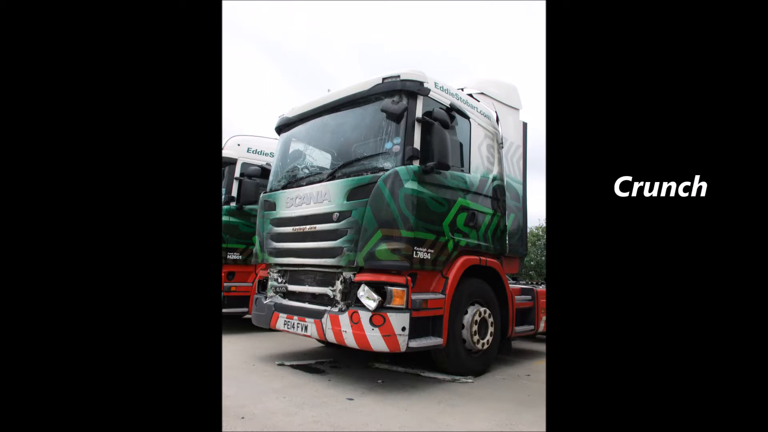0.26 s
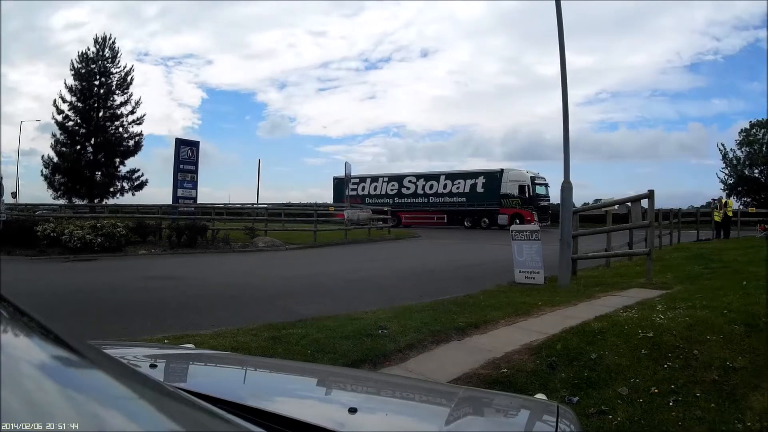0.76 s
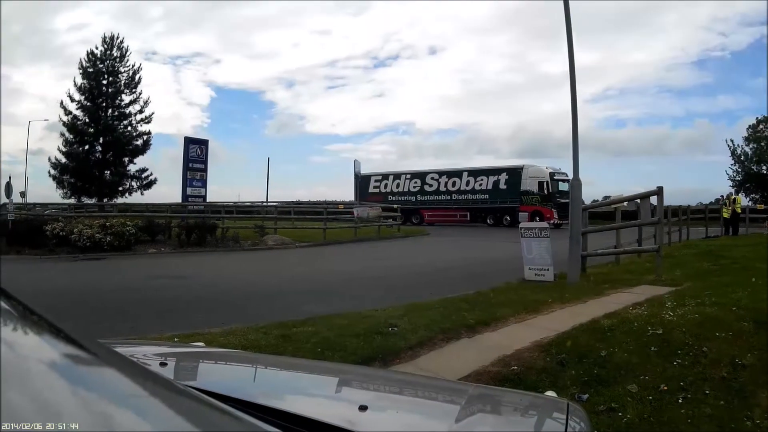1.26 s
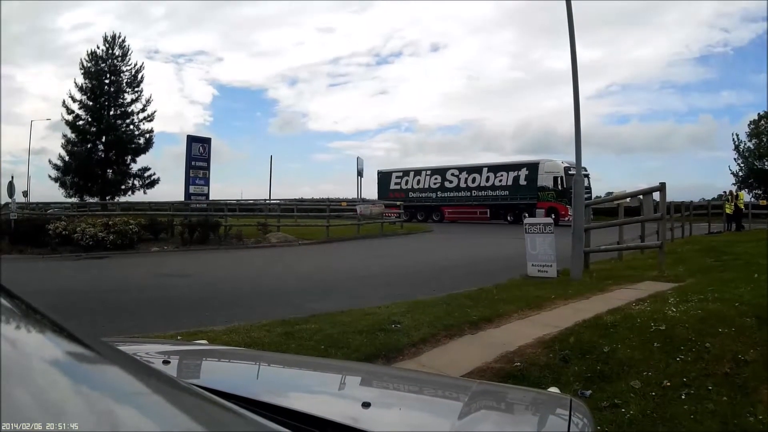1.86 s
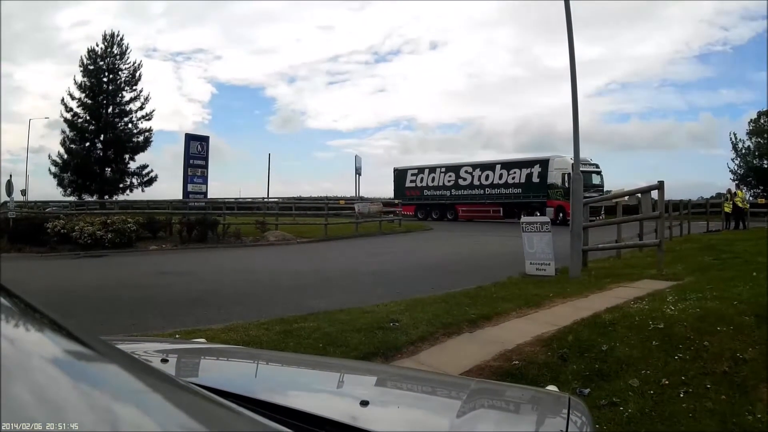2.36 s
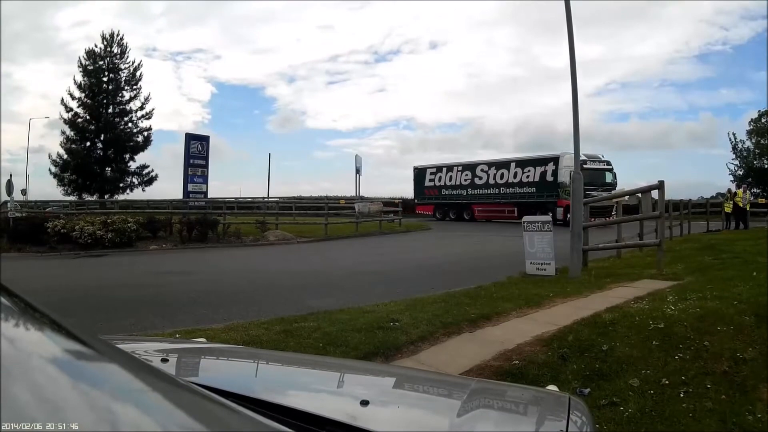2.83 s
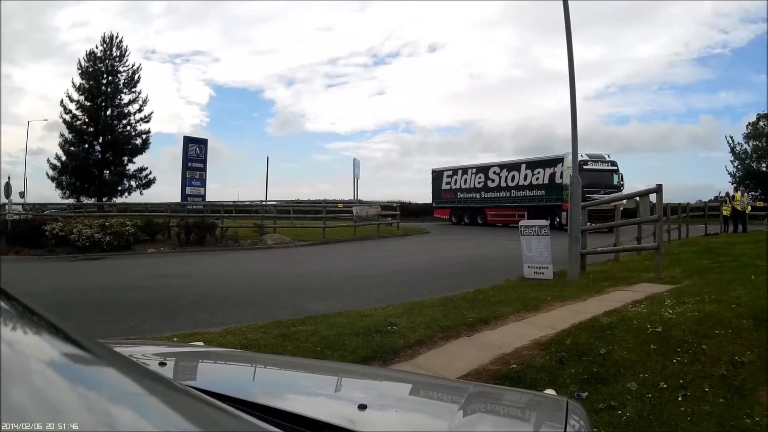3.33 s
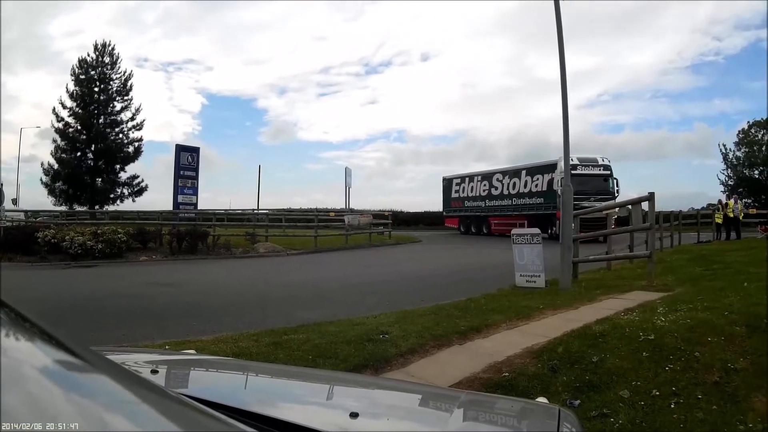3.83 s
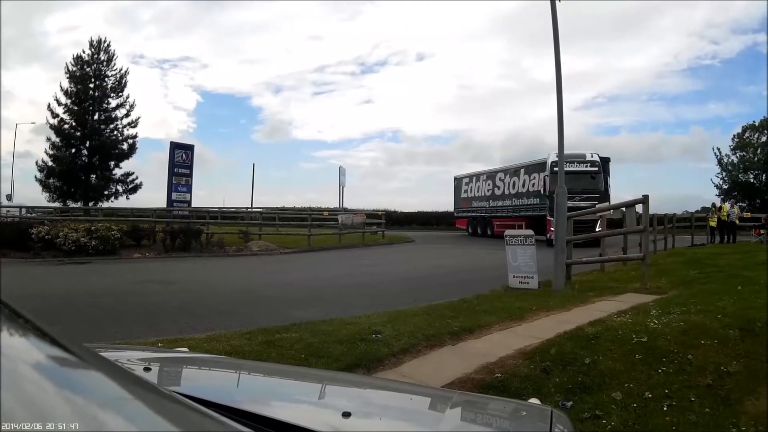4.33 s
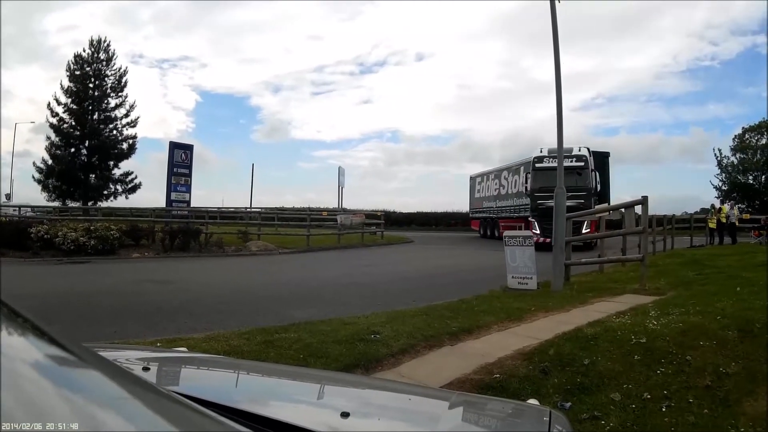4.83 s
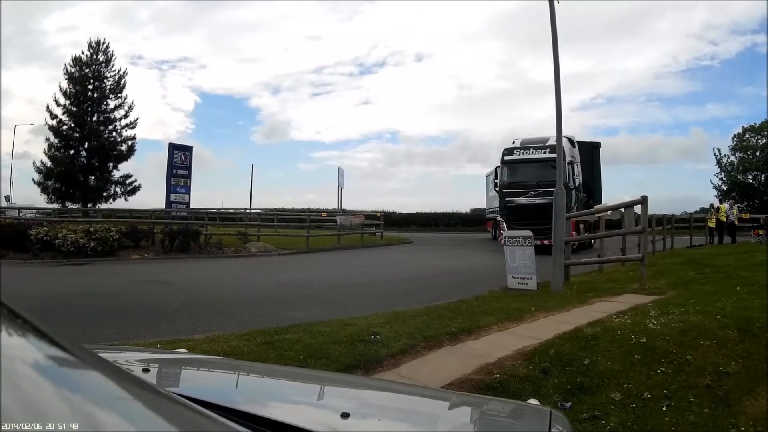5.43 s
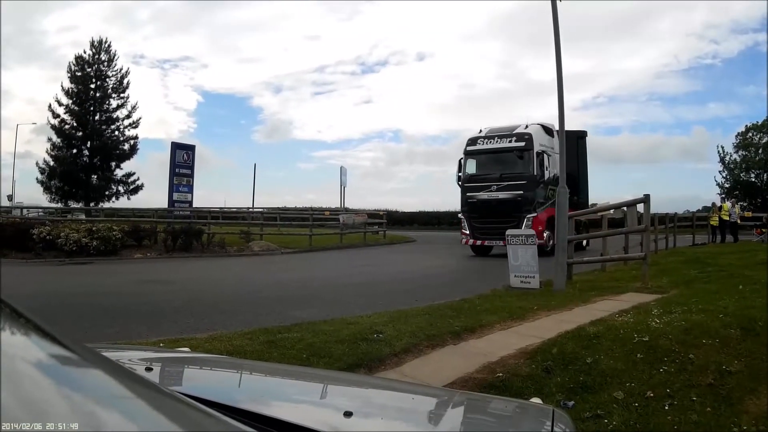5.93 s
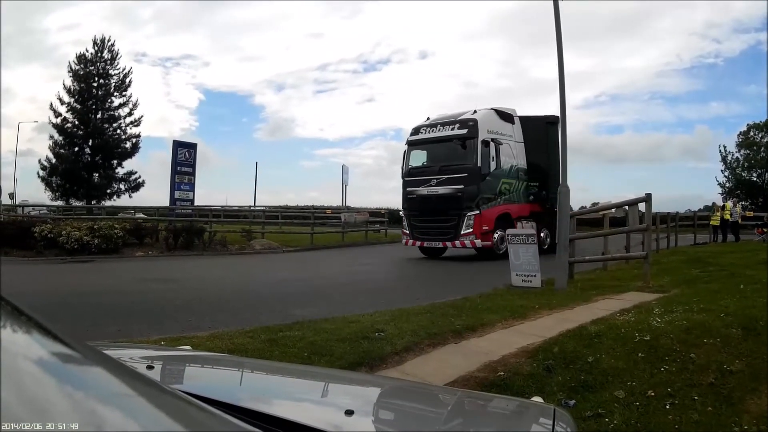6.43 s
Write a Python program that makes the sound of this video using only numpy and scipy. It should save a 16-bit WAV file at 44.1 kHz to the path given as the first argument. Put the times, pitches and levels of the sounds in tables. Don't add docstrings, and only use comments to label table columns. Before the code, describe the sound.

After brief silence, a heavy lorry's rough tyre roar and diesel rumble build closer while wind gusts thud against a small outdoor microphone.

```python
import sys
import numpy as np
from scipy import signal
from scipy.fft import rfft, irfft
from scipy.io import wavfile
from scipy.ndimage import uniform_filter1d

SR = 44100
rng = np.random.default_rng(int(sys.argv[2]) if len(sys.argv) > 2 else 0)


def makeup_ratio(level_db):
    decades = np.asarray(level_db, float) / 20
    return 10 ** decades


def to_wav(sig):
    pcm = np.clip(np.atleast_2d(sig), -1, 1) * 32767
    pcm = np.round(pcm).astype(np.int16)
    wavfile.write(sys.argv[1], SR, pcm.T)


N = 294588
T = np.arange(N) / SR

# time in seconds, tyre roar in dB, engine load in dB, charge-air boost in dB.
LORRY = [(.62, -20.5, -3, -5), (1.0, -19.5, -2.5, -.5), (1.5, -19, -2.5, -1), (1.8, -17, 0, -1.5),
         (2.0, -19.5, 0, 0), (2.5, -17, 0.5, 0), (3.0, -17.5, 0.5, 3), (3.45, -17, 1, 1.5),
         (3.8, -15, 0.5, 2.5), (4.05, -18, -2, -1.5), (4.4, -18, 1, 0), (4.65, -18.5, -2, -3.5),
         (5.0, -18.5, -1, -3), (5.4, -18.5, -1.5, -2.5), (5.95, -15.5, 1, 2), (6.25, -16.5, 3, 1.5),
         (6.68, -14.5, 5, 5)]


def evened(x):
    return x / np.sqrt(np.mean(x ** 2) + 1e-20)


def read(points, hz):
    table_hz, db = np.transpose(points)
    return np.interp(np.log(hz + 1), np.log(table_hz + 1), db, -90, -90)


def curves(rows):
    s, *columns = np.transpose(rows)
    return [np.interp(T, s, column) for column in columns]


def band(x, lo_hz, hi_hz, order=2):
    edges_hz = [lo_hz, min(hi_hz, SR / 2 - 100)]
    return signal.sosfilt(signal.butter(order, edges_hz, "band", fs=SR, output="sos"), x)


def hiss(colour, patchy_db, flicker_db):
    frames = N // 128 + 5
    real, imaginary, patches = rng.standard_normal((frames, 257, 3)).T
    patches = uniform_filter1d(patches, size=4, axis=0)
    patches = evened(uniform_filter1d(patches, size=24, axis=1))
    flicker = evened(uniform_filter1d(rng.standard_normal(frames), size=8))
    spectrum = (real + 1j * imaginary) * makeup_ratio(patchy_db * patches + flicker_db * flicker)
    noise = signal.istft(spectrum, nperseg=512, noverlap=384)[1][:N]
    colour_db = read(colour, np.fft.rfftfreq(N, 1 / SR))
    return evened(irfft(rfft(noise) * makeup_ratio(colour_db), N))


def traffic():
    # frequency in Hz, level in dB per Hz.
    boom_colour = [(40, -40), (100, -8), (200, -9), (350, -0.5), (500, 2), (700, 4.5), (850, -12),
                   (1100, -30)]
    roar_colour = [(600, -37), (780, -3.5), (920, 0), (1080, -1.5), (1230, -2), (1610, -4.5), (1750, -9),
                   (1930, -10.5), (2300, -31.5)]
    clatter_colour = [(1500, -35), (1900, -3), (2300, 0), (2850, -4), (3240, -9), (3450, -20), (3900, -39)]
    fizz_colour = [(3000, -5), (3500, -0.5), (4050, -1.5), (4850, 0.3), (5200, -6.5), (5850, -2.5),
                   (7000, -11), (8600, -17), (10300, -16), (11200, -22), (13700, -22), (15000, -28),
                   (15750, -33)]
    roar_db, load_db, boost_db = curves(LORRY)
    coast_db = -4 * np.exp(-((T - 4.16) / .15) ** 2)
    boom_db = -22.5 + 0.72 * load_db + coast_db
    clatter_db = -30 + 1.18 * load_db
    fizz_db = -46 + 0.85 * boost_db
    roar = makeup_ratio(roar_db) * hiss(roar_colour, 0.54, 0.72)
    boom = makeup_ratio(boom_db) * hiss(boom_colour, 1.04, 0.58)
    clatter = makeup_ratio(clatter_db) * hiss(clatter_colour, 0.62, 0.9)
    fizz = makeup_ratio(fizz_db) * hiss(fizz_colour, 1.2, 0.67)
    return roar + boom + clatter + fizz


def exhaust():
    # time in seconds, firing rate in Hz, level in dB.
    firing = [
        (.61, 42.36, -35),
        (.75, 40.5, -29.5),
        (.85, 45.7, -35),
        (.93, 47.4, -28.5),
        (1.44, 48.2, -31),
        (1.6, 46.7, -42),
        (1.95, 55.7, -38),
        (2.3, 58.5, -52),
    ]
    hz, db = curves(firing)
    turn = 2 * np.pi * np.cumsum(hz) / SR
    note = np.sin(turn) + makeup_ratio(-21) * np.sin(2 * turn)
    return np.sqrt(2) * makeup_ratio(db) * note * (T < firing[-1][0])


def wind():
    # time in seconds, wind strength in dB.
    strength = [(.62, -40), (1.0, -37), (1.4, -38), (1.6, -28.5), (1.9, -31.5), (2.45, -31.5), (2.8, -21),
                (3.0, -24), (3.2, -21), (3.4, -28.5), (3.62, -20), (4.1, -36), (4.4, -21), (5.2, -26),
                (5.75, -23.5), (6.0, -26), (6.2, -25), (6.68, -21.5)]
    strength_db, = curves(strength)
    lumps = evened(band(rng.standard_normal(N), 5.8, 24))
    rumble = evened(band(rng.standard_normal(N), 12.6, 107))
    flutter = evened(band(rng.standard_normal(N), 103, 345))
    flutter_db = -30 + 0.73 * (strength_db + 28)
    pressure = makeup_ratio(strength_db) * rumble + makeup_ratio(flutter_db) * flutter
    return makeup_ratio(1.3 * np.clip(lumps, -2, 2)) * pressure


def arch(start, end, from_hz, to_hz, peak_db):
    u = np.linspace(0, 1, 15)
    db = peak_db - 15 * (2 * u - 1) ** 2
    return np.transpose([start + (end - start) * u, from_hz + (to_hz - from_hz) * u, db])


def whine(rows, width_hz):
    s, hz, db = np.transpose(rows)
    at = (T > s[0]) & (T <= s[-1])
    r = np.exp(-np.pi * width_hz / SR)
    length = N if s[-1] - s[0] > 1.6 else N // 3
    chance = [1, 1j] @ rng.standard_normal((2, length))
    waver = signal.lfilter([1], np.convolve([1, -r], [1, -r]), chance)[-at.sum():]
    steady = waver / abs(waver) ** (.75 * np.exp(-width_hz / 150))
    carrier = np.exp(2j * np.pi * np.cumsum(np.interp(T[at], s, hz)) / SR)
    out = np.zeros(N)
    out[at] = makeup_ratio(np.interp(T[at], s, db)) * evened((steady * carrier).real)
    return out


def whines():
    # time in seconds, pitch in Hz, level in dB.
    gear = [
        (1.75, 500, -42),
        (1.92, 510, -29),
        (2.2, 550, -29),
        (2.45, 586, -28.5),
        (2.7, 600, -35),
        (3.2, 655, -36),
        (3.4, 665, -48),
    ]
    tread = [
        (2.4, 900, -36),
        (3.0, 933, -25),
        (3.5, 906, -25),
        (3.9, 903.6, -38),
        (4.3, 944, -31),
        (4.75, 939, -21),
        (5.5, 920, -39),
        (6.1, 940, -25),
        (6.68, 935, -32),
    ]
    grooves = [
        (.62, 1113, -27),
        (1.2, 1137, -25.5),
        (1.8, 1188, -19.5),
        (2.3, 1153, -24.5),
        (2.9, 1185, -38),
        (3.8, 1260, -23),
        (4.2, 1253, -32),
    ]
    turbo = [
        (1.9, 7400, -80),
        (2.15, 7780, -73),
        (2.42, 8230, -64),
        (2.65, 8450, -73),
        (3.05, 8700, -78),
        (3.3, 8450, -70),
        (3.55, 7800, -66),
        (3.88, 7530, -64),
        (4.1, 7500, -78),
    ]
    # start and end in seconds, from and to in Hz, peak in dB.
    squeals = [(.8, 1.15, 560, 568, -34), (1.1, 1.55, 575, 592, -29), (5.6, 6.7, 520, 545, -26),
               (6.42, 6.7, 1390, 1470, -21), (6.2, 6.45, 1130, 1270, -24), (.7, 1.25, 2950, 3030, -44),
               (5.85, 6.8, 3385, 3410, -44), (5.2, 6.2, 5650, 6030, -63), (5.95, 7.0, 6040, 6060, -51),
               (.78, 1.05, 10500, 10600, -70), (.7, 1.3, 12350, 12350, -77), (.7, 1.3, 13050, 13050, -75),
               (1.15, 1.4, 11700, 11700, -72)]
    hisses = [
        (5.7, 7.7, 3300, 3350, -50),
        (6.0, 6.95, 7700, 7680, -59),
    ]
    fan = [(s, 12400, -71 + 2.4 * boost_db) for s, *_, boost_db in LORRY]
    out = whine(gear, 7) + whine(tread, 30) + whine(grooves, 350)
    out += whine(turbo, 70) + whine(fan, 1600)
    out += sum(whine(arch(*row), .011 * row[2]) for row in squeals)
    return out + sum(whine(arch(*row), .065 * row[2]) for row in hisses)


def valve():
    count, start_s, gap_s, hurry_s = 13, 5.1095, .1205, .00045
    k = np.arange(count)
    spread_db = 2.2 * rng.standard_normal(count)
    db = -49.5 + 5.5 * np.minimum(k / 4, 1) + spread_db
    return list(zip(start_s + gap_s * k - hurry_s * k ** 2, db))


def ticks():
    # start in seconds, peak in dB.
    stray = [(.8883, -45), (.935, -44), (1.27, -41), (2.808, -50.5), (2.9731, -45), (3.7923, -45),
             (4.7416, -49)]
    # start in seconds, peak in dB, knock in dB.
    clacks = [
        (3.5495, -47, 27),
        (3.844, -46, 13),
        (5.68, -46, 16),
    ]
    t = np.arange(900) / SR
    shape = makeup_ratio(-60 * t / .028) * np.minimum(t / .001, 1)
    modes = np.sin(2 * np.pi * 1050 * t) + .3 * np.sin(2 * np.pi * 2850 * t)
    knock = evened(shape * makeup_ratio(-60 * t / .03) * modes)
    rows = clacks + [(s, db, -8) for s, db in stray + valve()]
    out = np.zeros(N)
    for (s, db, knock_db), puff in zip(rows, rng.standard_normal((len(rows), 900))):
        tick = evened(band(puff, 9000, 13700, order=3) * shape)
        tap = makeup_ratio(db - 17) * (tick + makeup_ratio(knock_db + 18) * knock)
        part = out[round(s * SR):][:900]
        part += tap[:len(part)]
    return out


def gusts():
    # middle in seconds, level in dB, centre in Hz, length in seconds.
    thuds = [(1.204, -33, 170, 0.032), (2.15, -24, 150, 0.11), (5.231, -15, 300, .04),
             (2.686, -13, 112, .037), (2.768, -18, 155, .09), (3.085, -18, 229, .12),
             (3.236, -16, 190, .09), (3.55, -18, 110, 0.081), (3.67, -9, 188, .13), (3.775, -22, 170, .093),
             (4.327, -13.5, 130, 0.041), (4.444, -5, 236, .09), (4.453, -14, 60, .09),
             (4.6, -22, 152.9, .077), (4.668, -13.5, 215, 0.029), (4.762, -17.5, 174, 0.069),
             (4.977, -17, 71, 0.034), (5.026, -15.5, 256, 0.094), (5.143, -11.5, 115.2, .035),
             (5.411, -11, 203, 0.079), (5.491, -6.5, 213, 0.039), (5.535, -8, 238, 0.093),
             (5.581, -14.5, 71, .036), (5.794, -6, 147, 0.087), (5.8, -16, 320, 0.063),
             (6.147, -18, 82, 0.063), (6.255, -18, 101, .09), (6.319, -16.5, 70.2, .1),
             (6.545, -8.5, 173, 0.05), (6.63, -8.5, 238, 0.093)]
    out = np.zeros(N)
    for (s, db, hz, length_s), air in zip(thuds, rng.standard_normal((len(thuds), 9000))):
        size = round(length_s * SR)
        turbulence = band(band(air, hz * 0.6, hz * 1.55, order=1), 23, 790)
        swell = evened(turbulence[-size:] * np.hanning(size))
        part = out[round(s * SR) - size // 2:][:size]
        part += 0.47 * makeup_ratio(db) * swell[:len(part)]
    return out


def scene():
    return (traffic() + exhaust() + wind() + whines() + ticks() + gusts())[None]


def low_pass(x):
    return signal.sosfilt(signal.butter(12, 15680, fs=SR, output="sos"), x)


def record(dry):
    # centre in Hz, width in Hz, gain in dB.
    port = [(7660, 590, 7), (9320, 510, 8), (11940, 710, 9.5), (12600, 630, 0), (1918, 99, -7)]
    # middle in seconds, edge in Hz above which sound is lost.
    lost = [(.839, 4050), (1.799, 3880), (2.481, 4400), (2.78, 3790), (2.929, 4700), (4.294, 4480),
            (4.358, 5020), (4.487, 4980), (4.678, 3526), (5.127, 3504), (6.021, 3640)]
    hz = np.fft.rfftfreq(N, 1 / SR)
    housing_db = sum(db / (1 + (2 * (hz - f) / width) ** 2) for f, width, db in port)
    x = np.clip(irfft(rfft(dry) * makeup_ratio(housing_db), N), -.99, .99)
    for s, above_hz in lost:
        at = slice(round(s * SR) - 900, round(s * SR) + 900)
        away_s = abs(T[at] - s)
        high_pass = signal.butter(8, above_hz, "high", fs=SR, output="sos")
        treble = signal.sosfiltfilt(high_pass, x[:, at])
        gap = 1 - np.sin(np.pi / 2 * np.clip((away_s - .002) / .014, 0, 1))
        line = makeup_ratio(-48) * np.sin(2 * np.pi * .97 * above_hz * T[at])
        x[:, at] += line * np.clip((.014 - away_s) / .004, 0, 1) - gap * treble
    opening = np.clip((T - .6133) / .0015, 0, 1)
    return low_pass(x * opening)


dry = scene()
out = record(dry)
to_wav(out)
```